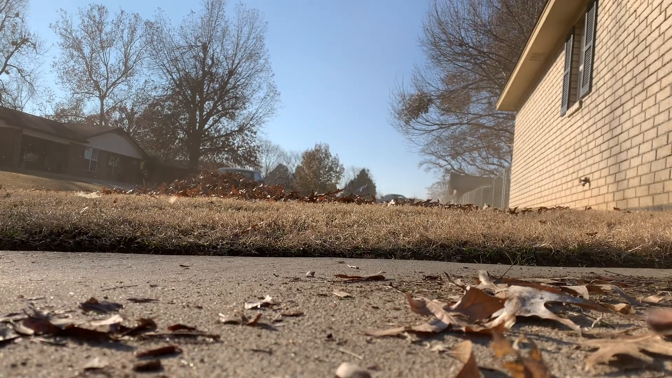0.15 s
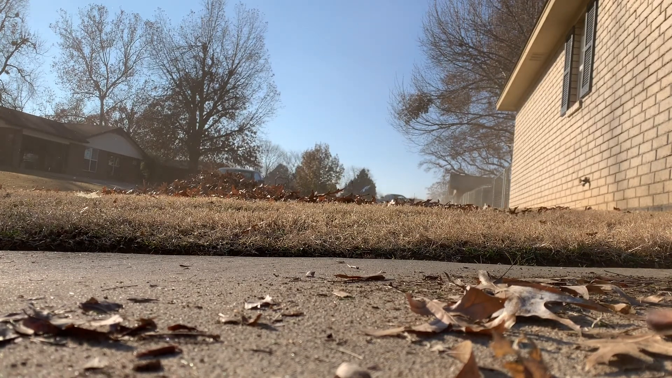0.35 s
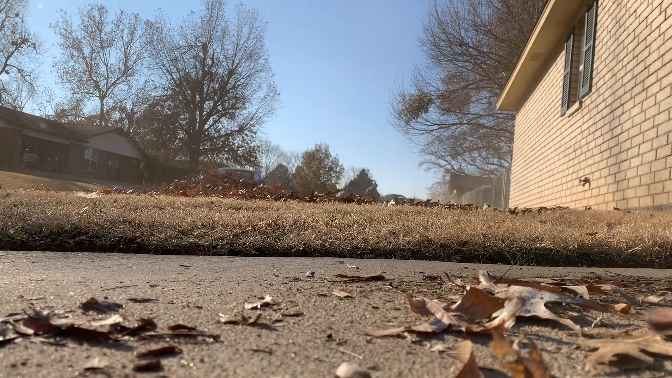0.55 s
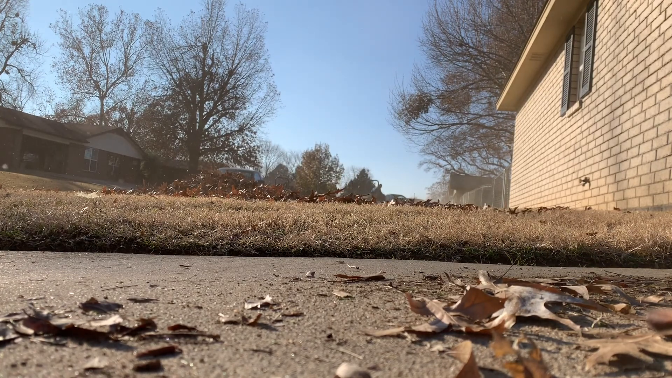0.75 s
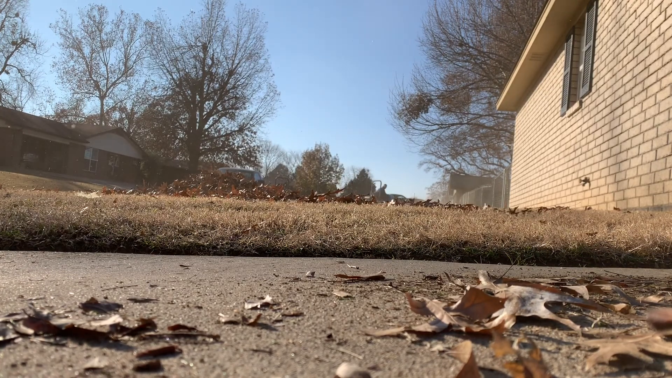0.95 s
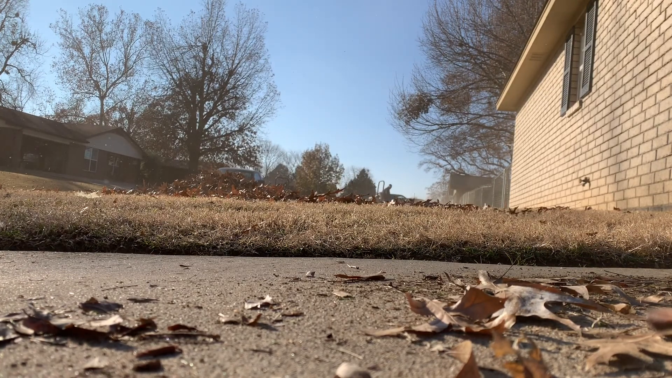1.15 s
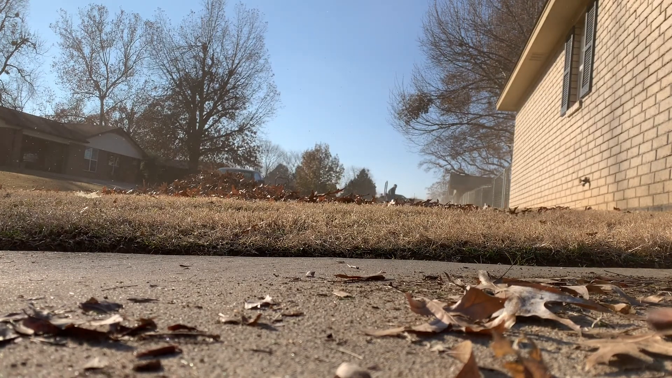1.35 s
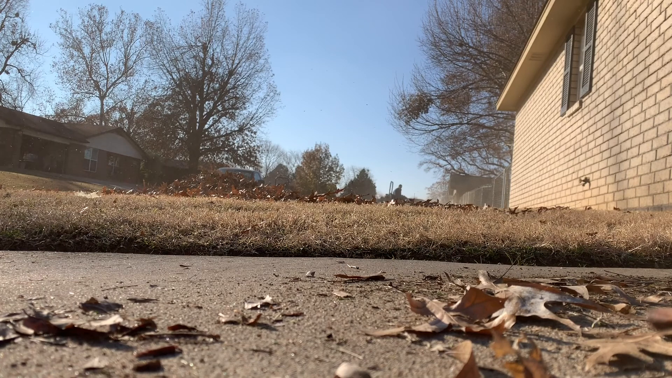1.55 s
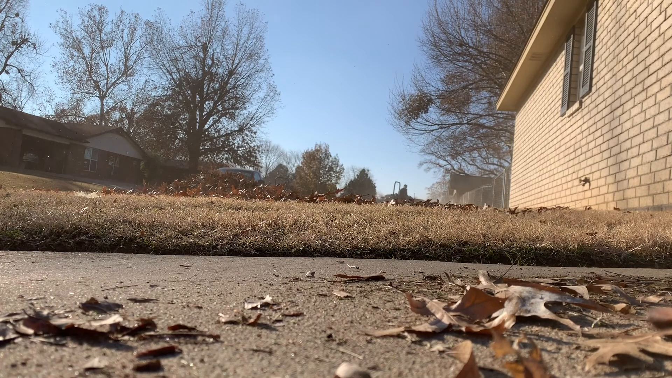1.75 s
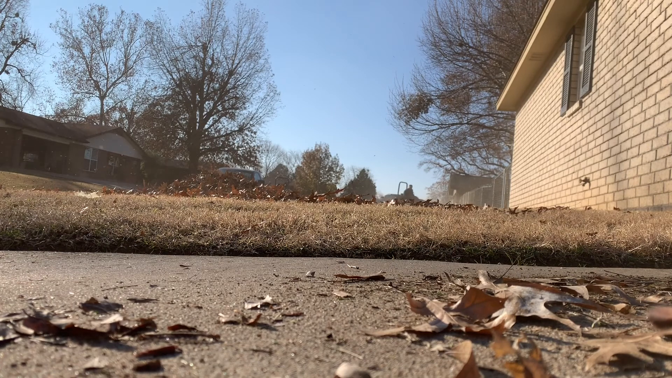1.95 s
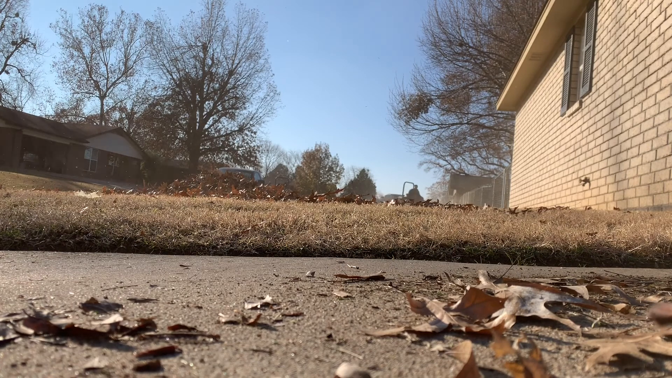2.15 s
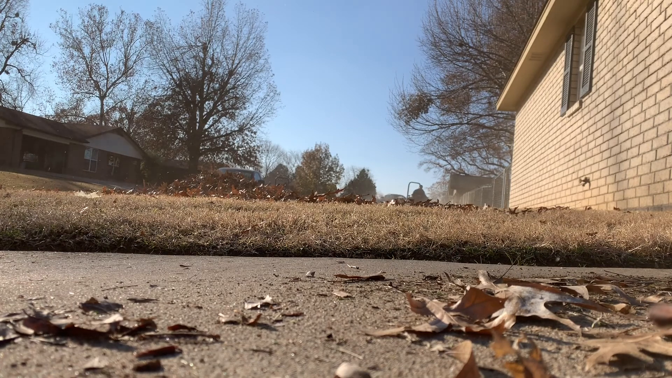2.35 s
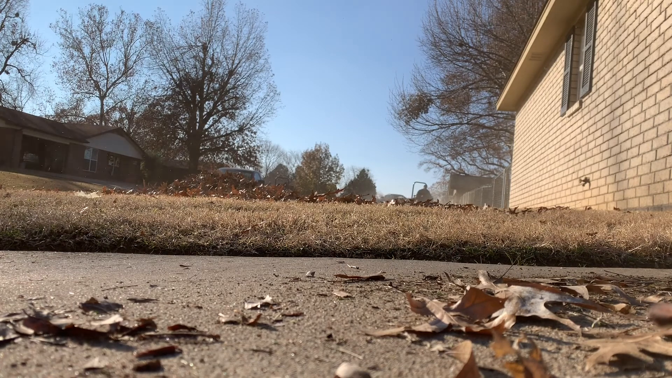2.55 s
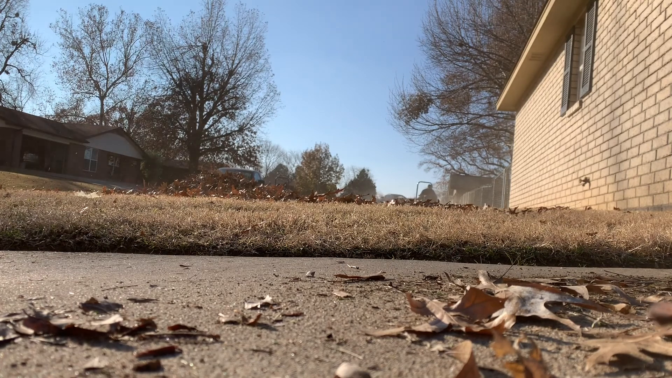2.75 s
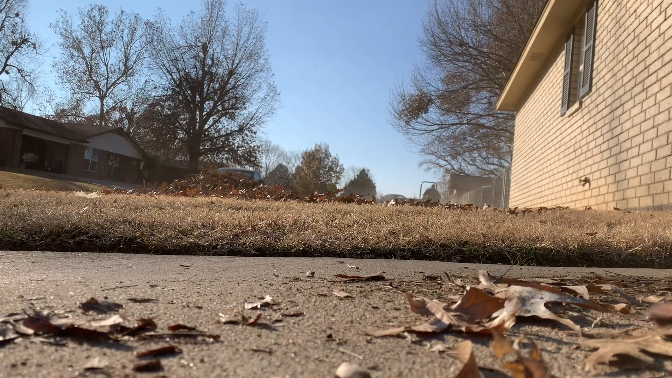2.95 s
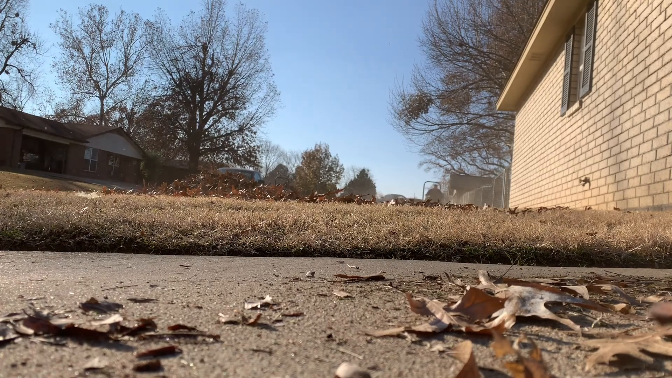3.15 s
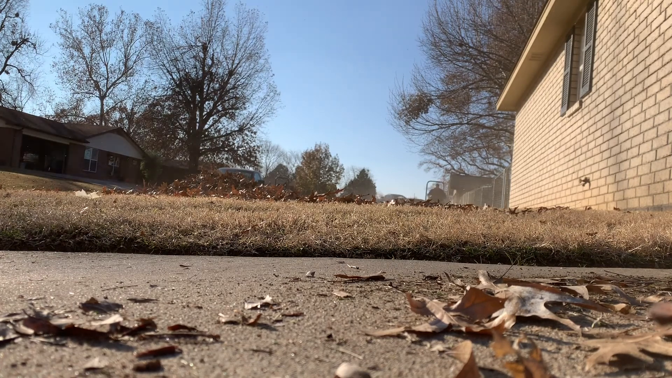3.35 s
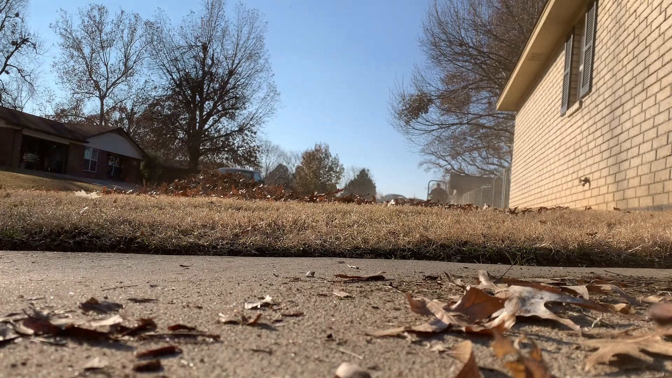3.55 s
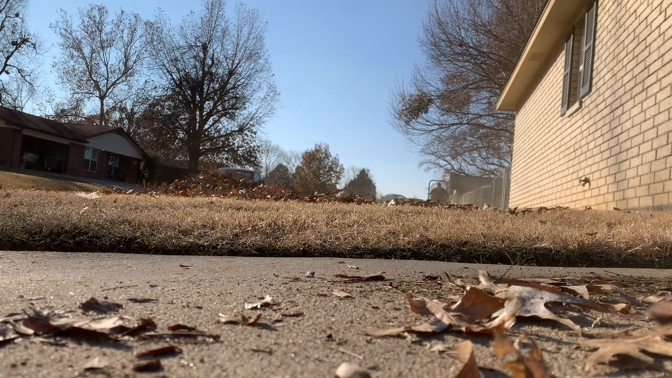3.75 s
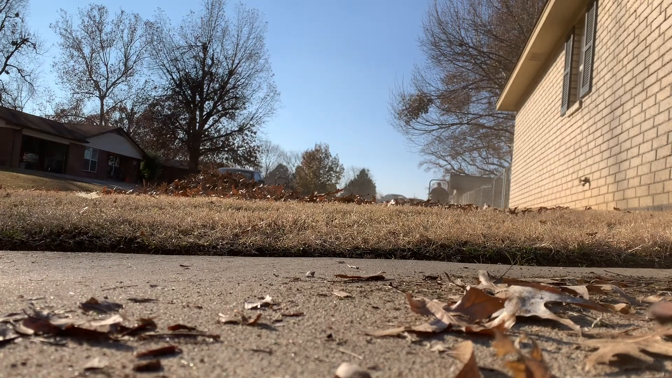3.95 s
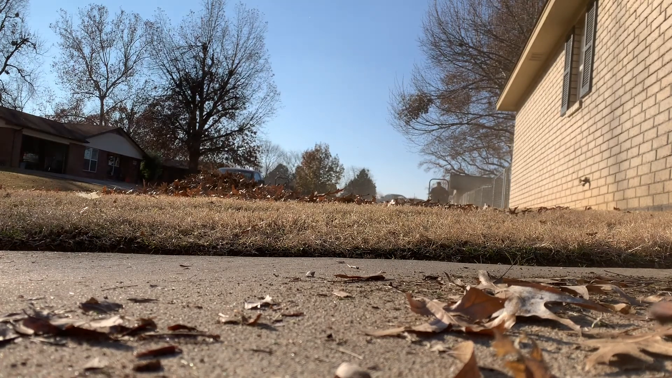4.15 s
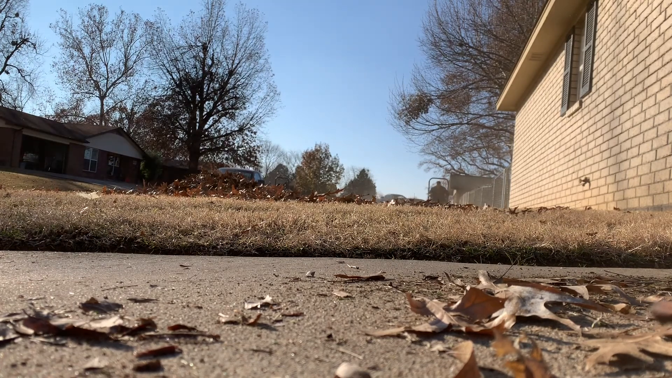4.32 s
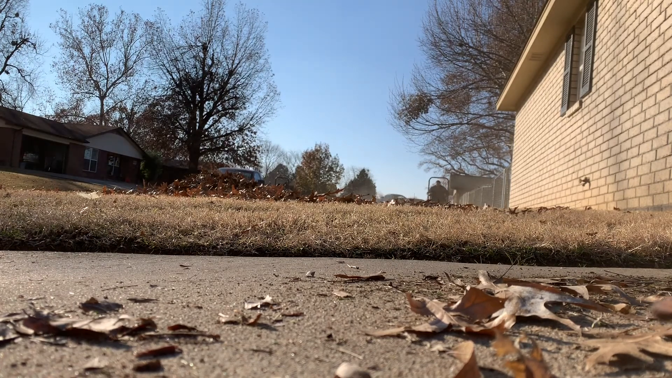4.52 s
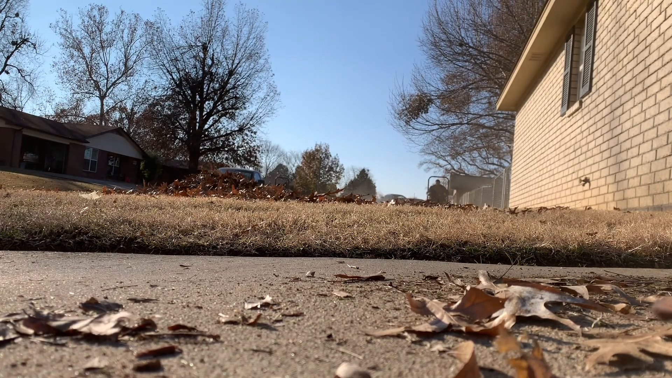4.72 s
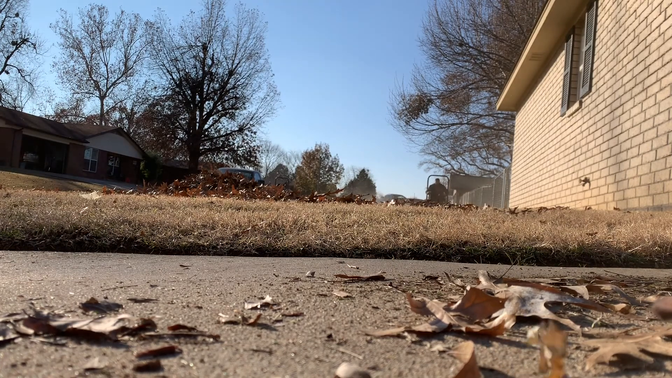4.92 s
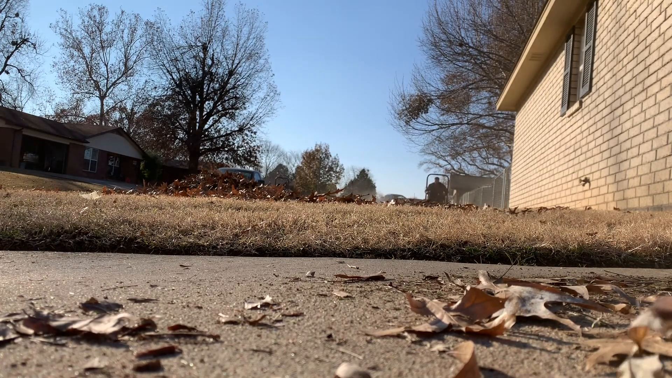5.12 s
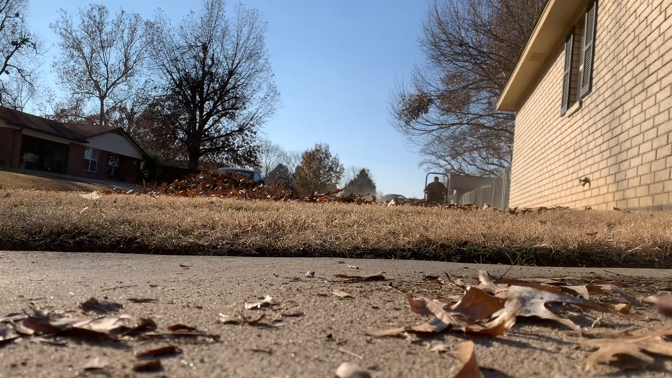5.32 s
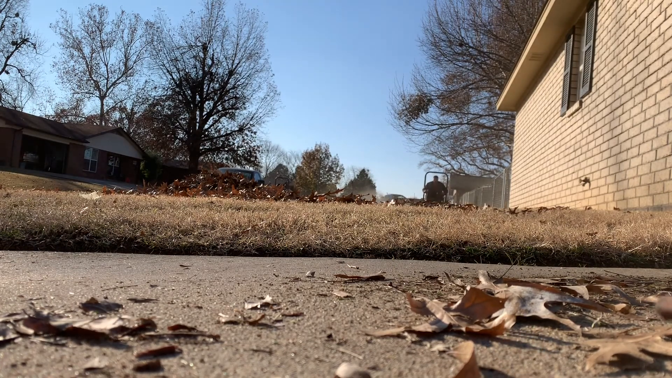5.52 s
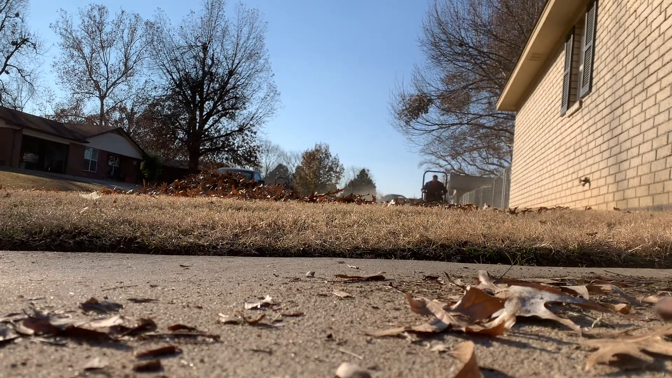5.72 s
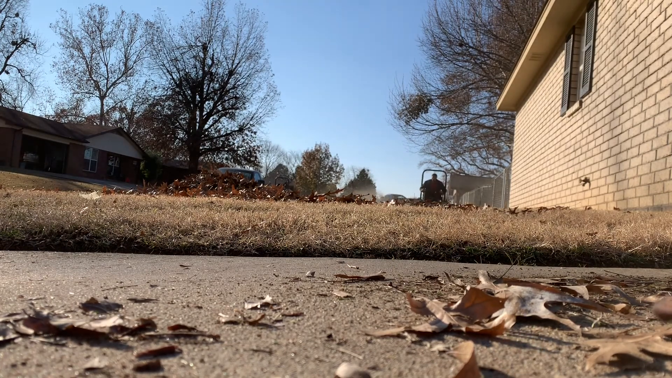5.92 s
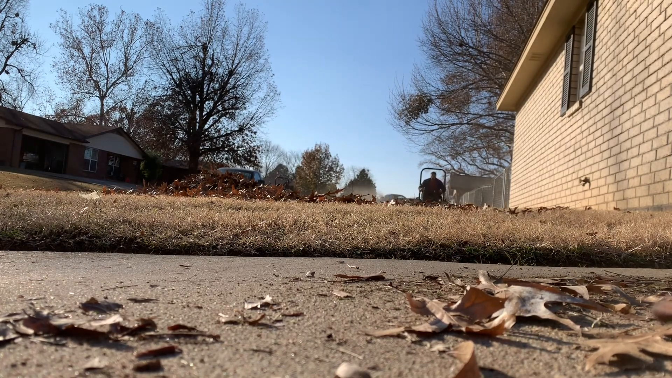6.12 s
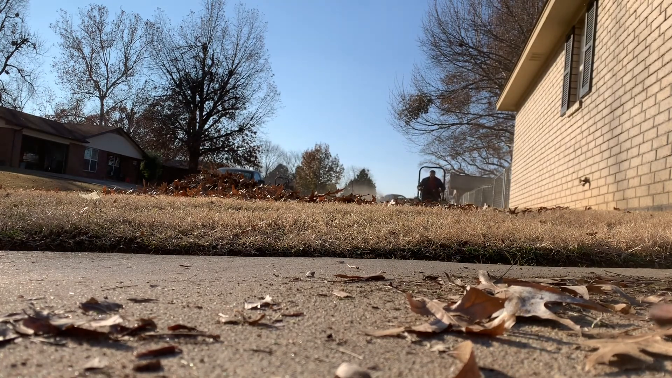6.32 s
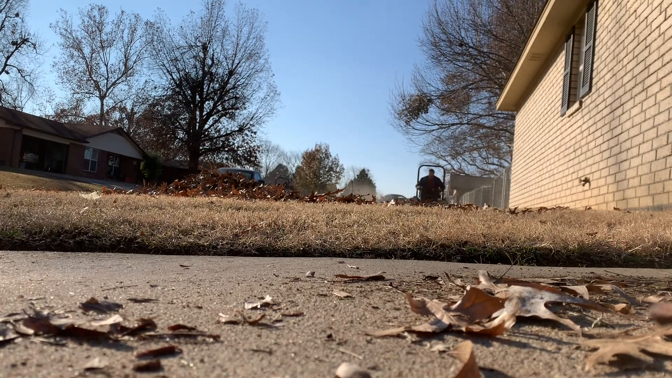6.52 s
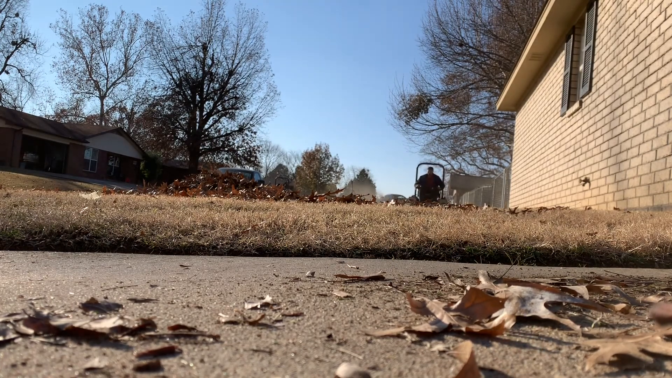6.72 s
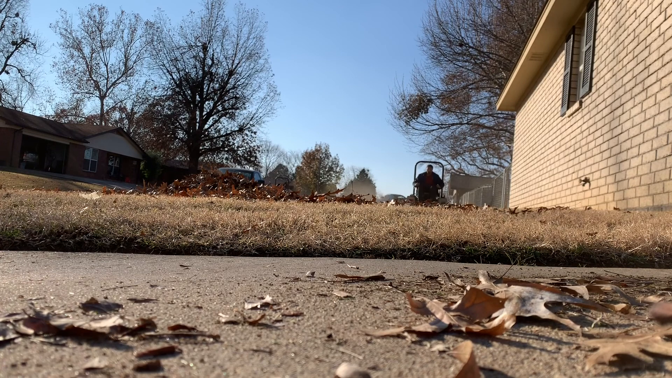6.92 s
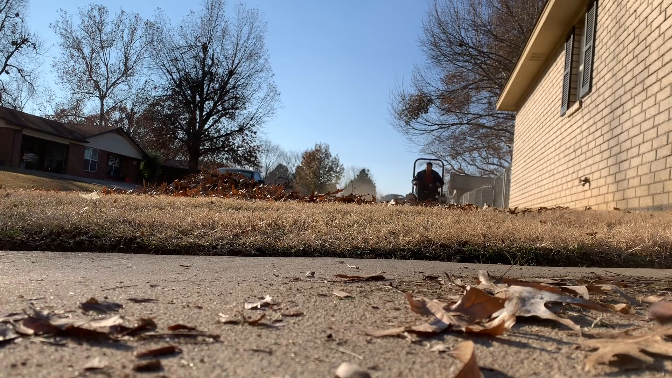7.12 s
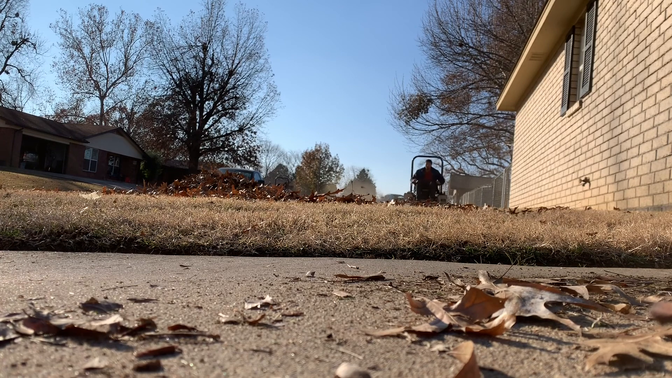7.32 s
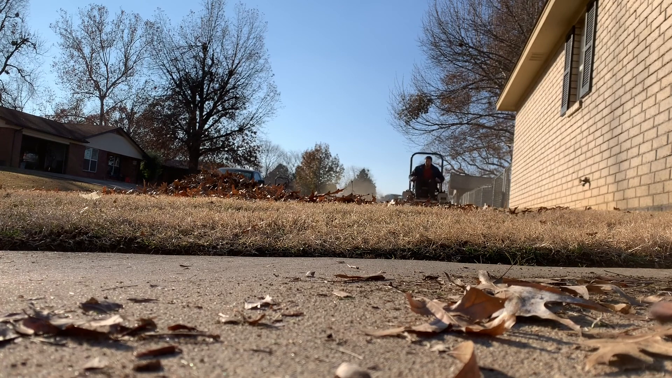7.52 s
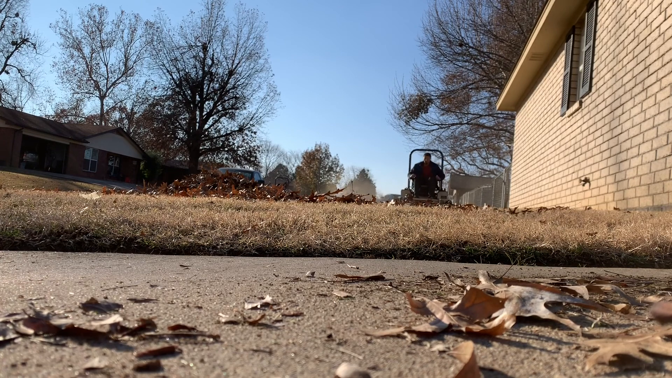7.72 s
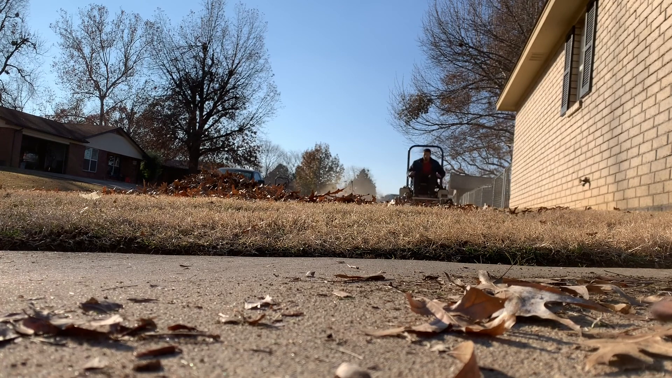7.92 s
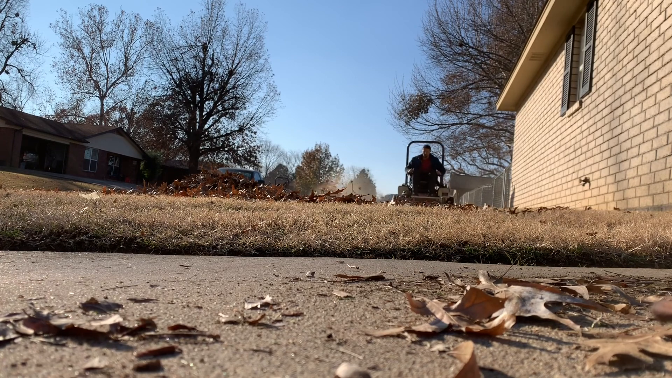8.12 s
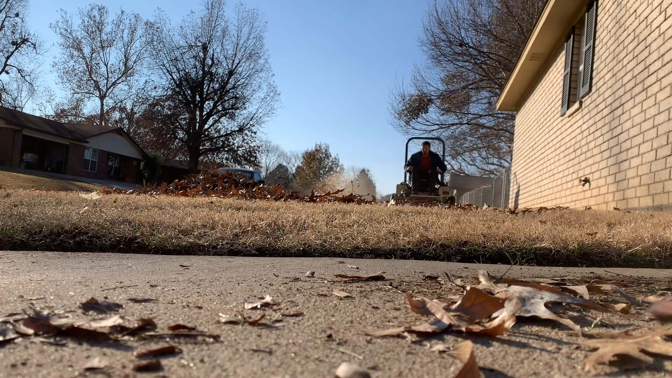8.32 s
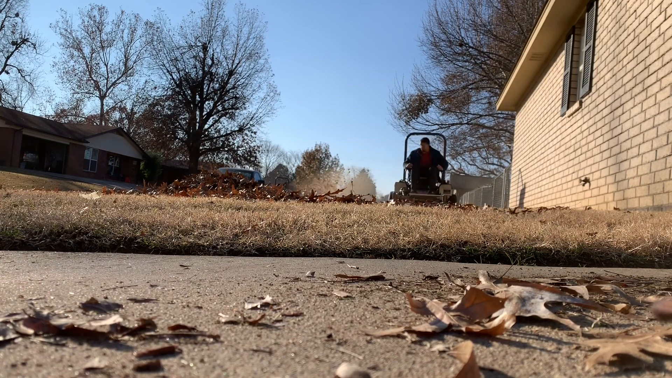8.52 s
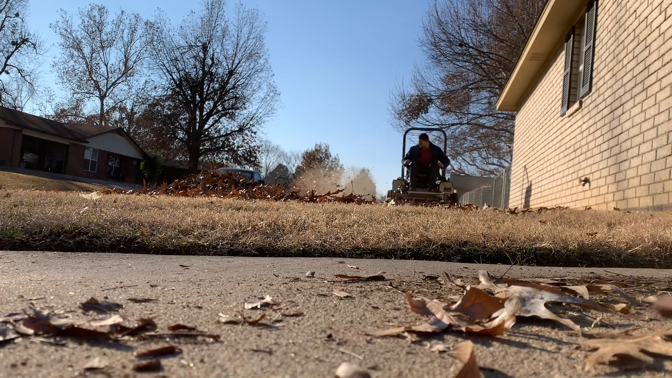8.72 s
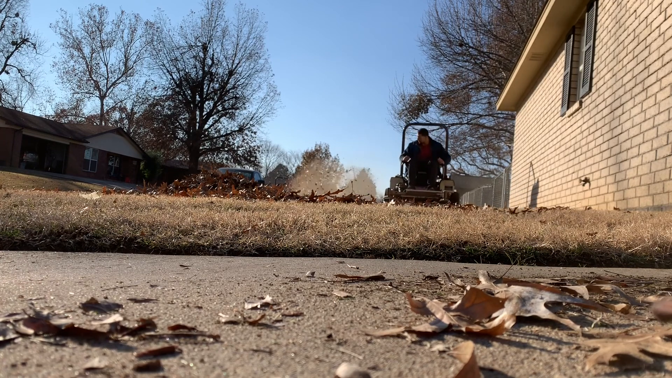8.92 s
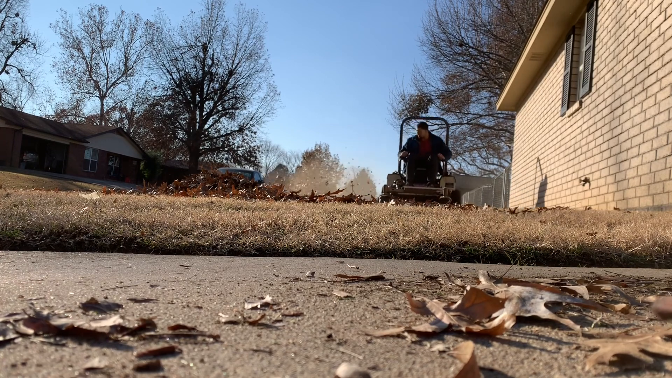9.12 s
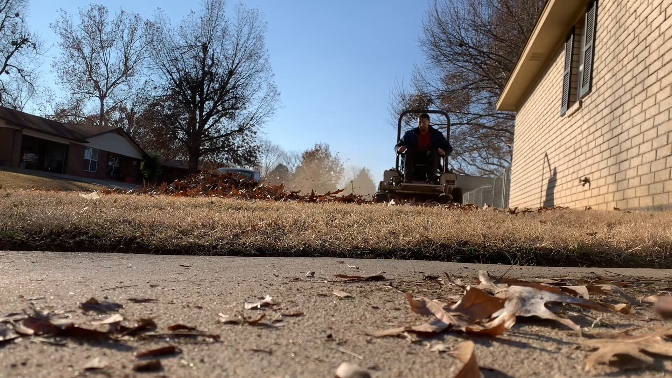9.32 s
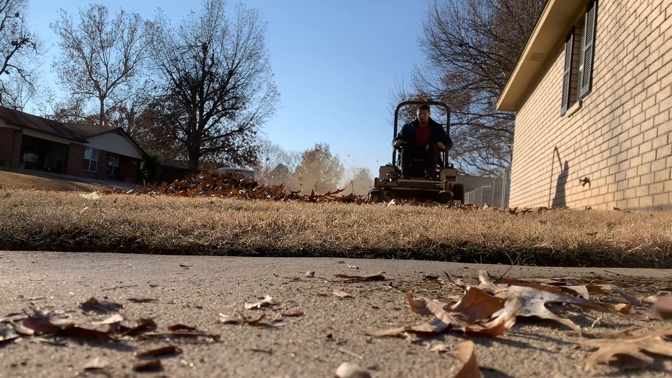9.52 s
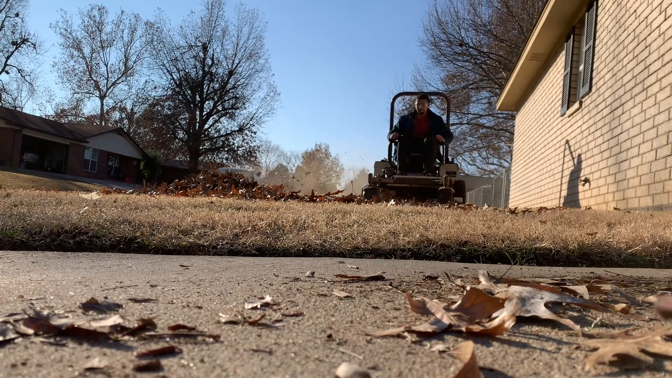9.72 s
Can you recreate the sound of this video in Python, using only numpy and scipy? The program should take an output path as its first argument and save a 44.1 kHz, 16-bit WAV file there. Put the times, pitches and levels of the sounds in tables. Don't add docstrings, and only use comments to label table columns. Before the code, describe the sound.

From 0 to 2 s a ride-on mower is far off on a lawn: a steady low hum near 130 Hz, slowly beating, over a rough uneven two-cylinder engine drone, with a faint unsteady hydraulic whine and a few tiny clicks. Around 2 to 4 s the hum swells and dips as the machine turns, while airy noise begins to rise. By 4.3 s a fuller roar of blade air and shredded leaves comes forward, with low wind buffets around 4 to 5.2 s and another near 6.9 s. From 5.5 s twigs snap, with a dense cluster near 5.9 s, and short hollow metal rattles start. From 6.4 to 9.7 s deck panels and chute flap knock irregularly, leaves crackle, and the roar grows brighter and nearer, ending at its loudest without stopping. The stereo microphone stays still at ground level on a path, with light echo from a house wall.

```python
import sys
import numpy as np
from scipy import signal
from scipy.fft import rfft, irfft, next_fast_len
from scipy.io import wavfile
from scipy.ndimage import uniform_filter1d

SR = 44100
rng = np.random.default_rng(int(sys.argv[2]) if len(sys.argv) > 2 else 0)


def amplitude_ratio(level_db):
    exponent = np.asarray(level_db, float) / 20
    return 10 ** exponent


def persist_wave(psi):
    counts = np.round(np.clip(psi, -1, 1) * 32767).astype(np.int16)
    wavfile.write(sys.argv[1], SR, np.atleast_2d(counts).T)


N = 430416
T = np.arange(N) / SR
SLOW = 64
T_SLOW = T[::SLOW]


def curves(table):
    s, *columns = np.transpose(table)
    return [np.interp(T, s, column) for column in columns]


def on_log(table, hz):
    f, value = np.transpose(table)
    return np.interp(np.log(hz + 1), np.log(f + 1), value)


def full_rate(slow):
    return np.interp(T, T_SLOW, slow)


def walk(rate_hz, rows=1, size=N, per_s=SR):
    hold = max(int(per_s / rate_hz), 1)
    held = np.repeat(rng.standard_normal((rows, size // hold + 1)), hold, axis=1)
    return 1.38 * uniform_filter1d(uniform_filter1d(held, hold), hold)[:, :size]


def bells(rows):
    return sum(db * np.exp(-((T_SLOW - s) / half_s) ** 2) for s, half_s, db in rows) + 0 * T_SLOW


def band(x, lo_hz, hi_hz):
    return signal.sosfilt(signal.butter(2, [lo_hz, hi_hz], "band", fs=SR, output="sos"), x)


def partial(turns, multiple, db, shake_db, slip_rad, lead_rad=0):
    shake, drift = (full_rate(w) for w in walk(18, rows=2, size=len(T_SLOW), per_s=SR / SLOW))
    phase = 2 * np.pi * multiple * turns + lead_rad + slip_rad * drift
    return np.sqrt(2) * amplitude_ratio(db + shake_db * shake) * np.sin(phase)


# time in seconds, rate in Hz.
TIP_PASS_HZ = [(0, 130.4), (.8, 129.5), (2.2, 130.7), (3, 130.1), (3.6, 130.6), (4.7, 131.3), (5.2, 130.6),
               (5.7, 131.7), (7, 131), (8, 130.7), (8.7, 131.7), (9.76, 130.8)]
# time in seconds, lead of each outer blade (two columns) over the middle in tip passes.
BELT_SLIP = [(0.0, 0.12, 0.86), (0.2, 0.11, 0.84), (0.41, 0.15, 0.81), (0.61, 0.38, 0.87),
             (0.81, 0.49, 0.89), (1.02, 0.43, 0.87), (1.22, 0.46, 0.89), (1.42, 0.47, 0.91),
             (1.63, 0.47, 1.03), (1.83, 0.53, 1.11), (2.03, 0.59, 1.02), (2.24, 0.56, 1.06),
             (2.44, 0.55, 1.1), (2.64, 0.38, 1.24), (2.85, 0.13, 1.38), (3.05, 0.16, 1.4),
             (3.25, 0.17, 1.44), (3.46, 0.14, 1.4), (3.66, 0.12, 1.37), (3.86, 0.11, 1.44),
             (4.07, 0.1, 1.45), (4.27, 0.71, 1.54), (4.47, 0.86, 1.48), (4.68, 0.8, 1.48),
             (4.88, 0.68, 1.5), (5.08, 0.49, 1.61), (5.29, 0.39, 1.64), (5.49, 0.37, 1.72),
             (5.69, 0.28, 1.82), (5.9, 0.22, 1.86), (6.1, 0.1, 2.05), (6.3, 0.04, 2.13),
             (6.51, -0.03, 2.39), (6.71, -0.07, 2.53), (6.91, -0.26, 2.48), (7.12, -0.24, 2.61),
             (7.32, -0.28, 2.6), (7.52, -0.3, 2.63), (7.73, -0.25, 2.69), (7.93, -0.3, 2.72),
             (8.13, -0.31, 2.83), (8.34, -0.3, 2.84), (8.54, -0.11, 3.01), (8.74, -0.08, 2.98),
             (8.95, -0.15, 3.07), (9.15, -0.22, 3.14), (9.35, -0.45, 3.25), (9.56, -0.49, 3.38),
             (9.76, -0.45, 3.33)]
# time in seconds, echo lag in tip passes, load on the blades in dB.
WALL_ECHO = [(0.0, 0.87, -2.1), (0.2, 0.73, -1.4), (0.41, 0.68, -1.9), (0.61, 0.64, -2.3),
             (0.81, 0.74, -2.0), (1.02, 0.75, -2.2), (1.22, 0.85, -0.1), (1.42, 0.86, -1.4),
             (1.63, 0.8, -3.2), (1.83, 0.89, 0.2), (2.03, 1.02, 4.7), (2.24, 1.07, 4.3), (2.44, 1.06, 5.0),
             (2.64, 0.98, 5.3), (2.85, 1.01, 7.7), (3.05, 1.0, 7.3), (3.25, 1.0, 3.8), (3.46, 1.02, 1.5),
             (3.66, 1.1, -0.7), (3.86, 1.11, -2.4), (4.07, 1.12, -1.9), (4.27, 1.31, -2.9),
             (4.47, 1.15, 0.7), (4.68, 1.22, 1.6), (4.88, 1.19, -0.0), (5.08, 1.25, -0.7),
             (5.29, 1.25, -3.1), (5.49, 1.16, -3.4), (5.69, 1.18, -3.2), (5.9, 1.15, -1.8),
             (6.1, 1.12, -1.1), (6.3, 1.17, -0.8), (6.51, 1.38, -0.2), (6.71, 1.35, 1.4), (6.91, 1.35, 0.5),
             (7.12, 1.4, -1.3), (7.32, 1.43, -0.7), (7.52, 1.51, 1.1), (7.73, 1.45, 2.0), (7.93, 1.48, 0.9),
             (8.13, 1.53, 1.3), (8.34, 1.54, -0.9), (8.54, 1.58, -1.8), (8.74, 1.56, -2.7),
             (8.95, 1.76, -2.0), (9.15, 1.72, 0.2), (9.35, 1.78, -1.8), (9.56, 1.87, -0.4),
             (9.76, 1.84, 1.0)]
# level in dB, share of the deck's turning in dB per dB.
TIP_MULTIPLES = [(-34, -0.074), (-34.5, 0.75), (-42.5, 0.14), (-46.5, 0.9), (-46, 1.4), (-46.5, 1.1),
                 (-54.5, 1), (-53.5, 3), (-52.5, 1.24), (-67, 1.9)]
TIP_SWELLS = {1: [(6.98, 0.32, 4), (9.4, 0.162, -1.5), (4.4, 0.12, 2), (3.71, 0.099, -6)],
              2: [(.3, .1, -4), (.55, .1, 3), (2.47, .1, -8), (5.3, .1, -3.5), (5.53, .1, 5.5),
              (8.12, .12, -1), (2.7, 0.082, 8), (4.3, 0.51, 1), (5.36, 0.12, -1), (7.95, 0.34, -5.5),
              (8.4, 0.098, 2.5), (9.55, .15, -2.5)], 3: [(2.3, 0.18, 0.5), (4.8, .35, 3), (6.1, 0.16, 1),
              (6.5, 0.15, -8), (4.36, 0.14, -7)], 4: [(1.4, 0.36, 4), (6.66, 0.17, 5), (7.1, 0.16, -6),
              (7.9, 0.18, 5)], 5: [(2.1, .25, 3.5), (8.85, 0.41, 8), (2.5, 0.13, 6), (1.75, .15, -7),
              (9, .17, -15)], 6: [(3.57, 0.17, 5), (8.8, 0.12, 2.5), (8.3, 0.4, 0), (4.07, .12, 5)],
              7: [(2.0, .25, 3), (7.9, 0.27, 4)], 8: [(1.2, .45, 6), (8.5, 0.26, 4), (9.4, .25, 6)],
              9: [(1.0, 0.26, 13.5), (2.3, 0.11, 4.5), (6.5, 0.28, 9)]}


def blades(turned_db):
    left_blade, right_blade, wall = .5, .46, -.46
    turns = np.cumsum(curves(TIP_PASS_HZ)[0]) / SR
    left, right, lag, load_db = (c[::SLOW] for c in curves(BELT_SLIP) + curves(WALL_ECHO))
    out = 0
    for k, (db, share) in enumerate(TIP_MULTIPLES, 1):
        spin = 2j * np.pi * k
        trio = 1 + left_blade * np.exp(spin * left) + right_blade * np.exp(spin * right)
        beat = trio * (1 + wall * np.exp(spin * lag))
        lead = full_rate(np.unwrap(np.angle(beat)))
        lead = (lead + k * k) * (k > 2)
        tone = partial(turns, k, db + share * turned_db, 0.4 + 0.07 * k, .018 * k, lead)
        swell_db = bells(TIP_SWELLS.get(k, []))
        out = out + tone * full_rate(abs(beat) * amplitude_ratio(load_db + swell_db))
    return out, turns


# time in seconds, effort as heard in dB, wall echo lag in cycles.
ENGINE_EFFORT = [(0.0, 0, 0.77), (0.45, -0.5, 0.632), (1.27, -2.5, 0.64), (2.02, -3.5, 0.565),
                 (2.65, -2, 0.704), (3.25, -1.5, 0.734), (3.92, -1, 0.753), (4.54, -0.5, 0.69),
                 (5.16, 1, 0.7), (5.82, 0.3, 0.79), (6.55, 0, 0.86), (7.19, 4, 0.803), (7.87, 1.5, 0.89),
                 (8.46, 2.5, 0.71), (9.04, 4, 0.75), (9.76, 5.5, 0.9)]
# time in seconds, rate in Hz.
CYCLE_HZ = [(0, 29.45), (.8, 29.1), (2, 29.35), (4.5, 29.3), (5.6, 29.55), (7, 29.35), (8.8, 29.55),
            (9.76, 29.3)]
# multiple of the cycle rate, level in dB, share of the effort swing in dB per dB.
FIRING_MULTIPLES = [(1, -63, .8), (2, -42, 1.28), (3, -44, 1.75), (4, -52.5, 0.97), (5, -46, 0.47),
                    (6, -45.5, 0.79), (7, -56.5, 0.56), (8, -52.5, 0.35), (10, -50.5, 0.29), (11, -74, .8),
                    (12, -76, .8), (14, -58, 0.71), (15, -64.5, .8)]
FIRING_DIPS = {2: [(.3, .4, -6)], 6: [(2.5, .7, -3.5), (9.0, .25, -5.5)], 7: [(9.2, 0.43, -10)],
               10: [(.2, .3, -6)]}


def engine():
    echo_strength, wander_db = 0.19, .12
    effort_db, lag = curves(ENGINE_EFFORT)
    turns = np.cumsum(curves(CYCLE_HZ)[0]) / SR
    out = 0
    for k, db, share in FIRING_MULTIPLES:
        echo = abs(1 + echo_strength * np.exp(2j * np.pi * k * lag[::SLOW]))
        dip = amplitude_ratio(bells(FIRING_DIPS.get(k, [])))
        level_db = db + share * effort_db + wander_db * k * walk(1.5)[0]
        out = out + full_rate(echo * dip) * partial(turns, k, level_db, shake_db=0.25, slip_rad=0.2)
    return out


# time in seconds, piston rate in Hz, level in dB.
DRIVE_PUMP = [(0, 406, -79), (.8, 407, -85), (1.4, 409.5, -84), (2, 414, -99), (9.76, 400, -92)]


def pump():
    hz, db = curves(DRIVE_PUMP)
    turns = np.cumsum(hz) / SR
    return sum(partial(turns, k, db, shake_db=4.0, slip_rad=2.5) for k in range(7, 12))


# frequency in Hz, curve number from 0.
CURVE_AT_HZ = [(300, 0), (700, 1), (1150, 2), (1650, 3), (2600, 4), (3800, 5), (4900, 5), (6000, 6),
               (11500, 6), (13000, 7)]
# frequency in Hz, density in dB per Hz.
ROAR_SPECTRUM = [(40, -73), (110, -61.5), (200, -64.5), (330, -66.5), (480, -68), (700, -70.5), (1000, -72),
                 (1200, -73.5), (1420, -81), (2000, -85.5), (2800, -89.5), (3400, -92.5), (4700, -96.5),
                 (5700, -102), (7000, -100), (8300, -103), (12000, -105), (15500, -109)]
# time in seconds, half length in seconds,
# frequency in Hz, half width in Hz, level in dB.
ROAR_STRIPS = [(3.6, 2.2, 5750, 300, 4), (7.2, 3.1, 6250, 500, -3.5), (2.0, 2.4, 14200, 800, -8),
               (3.2, 2.1, 3050, 250, -4.5), (8.7, 1.4, 3000, 250, 2), (7.4, .8, 3500, 210, 5.5),
               (5.6, 1.3, 17000, 460, 14), (6.3, .9, 5350, 160, -6), (.8, 1.6, 7900, 350, 0),
               (7.2, .4, 310, 39, -5.5), (3.6, 1.5, 2200, 250, 1.5), (5.5, 1.3, 16000, 900, -5),
               (.3, .5, 4500, 250, 4)]


def roar(turns, levels_db):
    hz, s, z = signal.stft(rng.standard_normal((2, N)), SR, nperseg=512)
    grid = dict(size=len(s), per_s=SR / 256)
    swing = np.array([np.interp(s, T, db - db.mean()) for db in levels_db])
    place = on_log(CURVE_AT_HZ, hz)
    weight = np.maximum(1 - abs(place[:, None] - np.arange(len(levels_db))), 0)
    strips = (np.sqrt(hz / hz[-1]) * 47.9).astype(int)
    flicker = walk(12, rows=24, **grid)[strips // 2]
    drift = walk(.9, rows=48, **grid)[strips]
    drift = uniform_filter1d(drift, size=5, axis=0) * (hz > 900)[:, None] * 1.2
    bursts = walk(24, **grid)
    bursts = (bursts - uniform_filter1d(bursts, size=25)) * np.clip(hz / 5000, 0, 1)[:, None]
    db = on_log(ROAR_SPECTRUM, hz)[:, None] + weight @ swing + 0.99 * flicker + drift + 1.2 * bursts
    for at_s, half_s, f, wide_hz, strip_db in ROAR_STRIPS:
        db = db + strip_db * np.exp(-((hz[:, None] - f) / wide_hz) ** 2 - ((s - at_s) / half_s) ** 2)
    air = signal.istft(z * amplitude_ratio(db), SR, nperseg=512)[1][:, :N] * np.sqrt(SR / 2)
    return air * (1 + .04 * np.cos(2 * np.pi * turns))


# time in seconds, half length in seconds, level in dB.
WIND_GUSTS = [(0, .15, -66), (0.552, 0.26, -67), (1.204, 0.31, -71), (3.65, .25, -60), (4.095, 0.2, -56),
              (4.55, 0.35, -60), (5.03, 0.073, -48), (5.222, .1, -47), (5.555, 0.39, -58),
              (6.142, 0.092, -60), (6.41, 0.11, -59), (6.87, 0.18, -52), (9.02, .1, -57), (9.5, .2, -61),
              (9.76, 0.047, -52)]


def gusts():
    calm_db = -72
    noise = rng.standard_normal((3, N))
    rumble = band(band(noise[0] + .04 * noise[1:], 26, 90), 14, 150)
    wind = amplitude_ratio(calm_db)
    for s, half_s, db in WIND_GUSTS:
        wind = wind + amplitude_ratio(db) * np.exp(-((T_SLOW - s) / half_s) ** 2)
    return rumble / rumble.std() * full_rate(wind) * amplitude_ratio(3.5 + 1.0 * walk(20)[0])


# time in seconds, peak level in dB, body level in dB.
TWIG_CRACKS = [(0.6664, -57, -5), (0.7277, -56, -5), (0.8094, -62, 2), (2.3294, -64, 5), (2.4594, -64, 5),
               (2.7744, -64, 5), (5.0749, -49, -2), (5.5214, -48, 19), (4.0271, -55, -3), (4.6642, -53, -3),
               (4.8932, -52, -3), (5.3282, -52, -3), (5.5676, -50, -5), (5.8086, -48, 3), (5.8326, -45, 2),
               (5.8854, -43, 5), (5.8994, -44, 5), (5.912, -45, 5), (5.94, -48, 8), (6.192, -47, 0),
               (6.4481, -46, -3), (7.9861, -48, -4), (8.5893, -43, -6), (8.8971, -43, -6),
               (9.2897, -44, -6), (6.0881, -46, -4), (6.2711, -42, -3), (6.4684, -44, -4),
               (6.6308, -47, -2), (7.1666, -46, -4), (7.4514, -45, -5), (7.635, -39, -14),
               (8.1314, -45, -7), (8.1594, -43, -7), (8.4357, -43, -7), (8.746, -42, -6), (8.8403, -43, -6),
               (9.0568, -43, -6), (9.4424, -41, -6), (9.5154, -43, -4)]


def twigs(hiss_db):
    bright, body, t = np.zeros(N + SR), np.zeros(N + SR), T[:SR // 25]
    for s, db, body_db in TWIG_CRACKS:
        crack = rng.standard_normal(len(t)) * np.exp(-t / .005) * amplitude_ratio(db - 2)
        start = int(s * SR)
        bright[start:][:len(t)] += crack
        body[start:][:len(t)] += crack * amplitude_ratio(body_db - 17)
    hits = rng.random(N) < 400 / SR
    sizes = amplitude_ratio(2.5 * np.minimum(rng.exponential(size=N), 3))
    crackle = hits * sizes * rng.choice([-1, 1], N) * amplitude_ratio(hiss_db - 7.0)
    return band(bright[:N] + crackle, 5000, 13500) + band(body[:N], 1800, 5000)


# time in seconds, peak level in dB, ring in Hz.
PANEL_RINGS = [(5.524, -25.5, 523.6), (5.772, -33, 704), (5.93, -32, 900), (6.141, -32.5, 875),
               (6.367, -39, 780), (6.458, -26.5, 833), (6.655, -22, 831), (6.685, -24, 827),
               (6.794, -34, 777), (6.984, -31, 980), (7.531, -27, 823), (7.727, -39, 799), (7.82, -28, 812),
               (7.962, -29, 820), (8.32, -25, 408.4), (8.964, -37, 783), (9.24, -26, 620.4),
               (7.058, -30, 890), (7.244, -23, 868), (7.334, -35, 657), (7.401, -33, 670),
               (7.901, -23.5, 842), (8.096, -27, 810), (8.207, -33, 812), (8.367, -29, 740),
               (8.432, -23, 795), (8.499, -23, 807), (8.568, -30, 809.3), (9.021, -25, 800),
               (9.078, -19, 794), (9.14, -35, 840), (9.413, -28, 753), (9.507, -28, 640), (9.591, -25, 593),
               (9.699, -32, 763)]
# time in seconds, peak level in dB, ring in Hz.
FLAP_RINGS = [(5.79, -35, 1183), (5.92, -33, 1194), (6.401, -32, 1230), (6.72, -25.5, 1063),
              (7.058, -24, 1206), (7.15, -26, 1063), (7.29, -26, 1203), (8.68, -28, 1024),
              (6.647, -25, 1200), (6.765, -23, 1168), (6.9324, -29, 1180), (7.044, -24, 1074),
              (7.116, -26.5, 1050), (7.246, -25.5, 1115), (7.3573, -36, 1080), (7.7275, -38, 1120),
              (7.771, -34, 1036), (7.96, -38, 1160), (7.978, -22.5, 1150), (8.037, -35, 1173),
              (8.058, -35, 1260), (8.072, -20, 1220), (8.354, -34, 1170), (8.399, -43, 1050),
              (8.4947, -25, 1203), (8.5968, -33, 1170), (9.3862, -25.5, 1064), (9.4489, -30, 1193),
              (9.562, -27, 1067), (9.6, -26, 1050), (9.644, -36, 1080), (9.7, -28, 1167)]


def rattles():
    out, t = np.zeros(N + SR), T[:SR // 8]
    swell = (1 - np.exp(-t / .0045)) * np.exp(-t / .011)
    for s, db, hz in PANEL_RINGS + FLAP_RINGS:
        out[int((s - .003) * SR):][:len(t)] += amplitude_ratio(db + 2.5) * swell * np.sin(2 * np.pi * hz * t)
    return out[:N]


# frequency in Hz, lag of the left port in radians.
PORT_LAG = [(20, 0), (1000, .9), (1950, 3.1), (2150, 6.7), (2600, 7.4), (3500, 9.4), (3950, 12.0),
            (4250, 12.8), (4600, 13.1), (5400, 15.5), (5850, 18.3), (6300, 19.0), (6900, 21.9),
            (8000, 23.9), (9300, 25.1), (11300, 28.2)]
# frequency in Hz, left minus right in dB.
PORT_TILT = [(60, -0.5), (200, 1.9), (700, -0.5), (1200, 1.5), (1800, 1), (2100, -4), (2700, 1), (3600, 2),
             (5800, 0), (7300, 2), (8300, -1), (10500, -2), (11300, 0)]
# frequency in Hz, likeness of the ports' scattered sound from 0 to 1.
PORT_LIKENESS = [(100, 0.63), (700, 0.92), (1300, 0.9), (1800, 0.66), (2500, 1), (3100, 0.96), (3600, 0.81),
                 (4200, 0.75), (5400, 0.62), (6150, 0.071), (6800, 0.66), (8500, .7), (9500, 0.45),
                 (10900, .99), (12000, 0.95)]
# frequency in Hz, level in dB.
DECK_BASS = [(15, -30), (45, -14), (110, -6), (200, -3), (300, 0)]
# time in seconds, level in dB.
SCATTERED = [(0, 0), (1.5, 0.5), (2.4, 3.5), (3.2, -1), (4.4, 0), (5.2, -2), (5.8, -0.5), (6.4, -1.5),
             (7.0, -2), (7.8, -4), (8.2, 0), (8.6, 2.5), (9.76, 3.5)]


def ports(direct, air):
    size = next_fast_len(N)
    hz = np.arange(size // 2 + 1) * SR / size
    f, radians = np.transpose(PORT_LAG)
    lag = np.interp(hz, f, radians) + 1.33 * np.maximum(hz - f[-1], 0) / 1000
    alike = np.clip(on_log(PORT_LIKENESS, hz), 0, 1)
    air = np.array([air[0], air[1] * amplitude_ratio(curves(SCATTERED)[0])])
    shared, apart = rfft(air, size) * amplitude_ratio(on_log(DECK_BASS, hz))
    mid = rfft(direct, size) + np.sqrt((1 + alike) / 2) * shared
    side = np.sqrt((1 - alike) / 2) * apart
    left = amplitude_ratio(on_log(PORT_TILT, hz) / 2) * np.exp(-.5j * lag)
    return irfft(np.array([(mid + side) * left, (mid - side) / left]), size)[:, :N]


# time in seconds, nearness in dB, deck turned this way in dB,
# blast from the chute in dB, shaking of the deck in dB.
MOWER_COURSE = [(0.0, -17.5, -16, -15.5, -17), (0.72, -20, -19.5, -15, -17.5),
                (1.22, -22.5, -17.5, -14.5, -16), (1.98, -21, -10.5, -13, -13.5),
                (2.39, -21, -12.5, -11.5, -14.5), (2.88, -21, -8.5, -12, -14.5),
                (3.42, -17.5, -8.5, -9, -13.5), (4.31, -9.5, -4.5, -2, -10), (5.07, -9, -7, -4, -11),
                (5.38, -9, -4.5, -7, -8.5), (5.72, -7.5, -3, -3.5, -10.5), (5.86, -2, -2.5, 2, -7.5),
                (6.02, -5.5, -2.5, -2, -5), (6.47, -3, -3, -1, -2), (6.68, -4, -3, 1, 0.5),
                (7.29, -0.5, 0.5, 0, 0), (7.9, 0, -0.5, -5, 0), (8.22, 1.9, -0.6, -3, -1.3),
                (9.44, 2.5, 0, -0.5, 0.5), (9.76, 4, 0.6, 2, 2.5)]
# share of nearness, of turning, of blast, of shaking, in dB per dB.
BAND_FOLLOWS = [
    (0, 0.5, 0.072, -0.063),
    (0, 0.92, -0.11, -0.069),
    (0, -0.15, -0.046, 1),
    (0.29, 0.56, 0.027, 0.048),
    (0.041, -0.058, 0.89, 0.0053),
    (0.66, -0.44, 0.42, -0.089),
    (0.9, -0.11, 0.064, 0.056),
    (1.34, 0.52, -0.41, -0.74),
]
# time in seconds, level in dB.
SIZZLE_SWAY = [(0, -1.5), (5.1, -0.5), (5.6, -8), (6.5, -4), (7.2, -2), (7.9, -3.5), (8.5, -2.5),
               (9.1, -3.5), (9.76, 1.5)]
# time in seconds, drone in dB, hiss in dB.
DRONE_HISS_SWAY = [(0, -3.5, -0.5), (.5, -4.5, 0), (1.1, -6, 1), (1.7, -5.5, 0.5), (2.2, -3, 0.5),
                   (3, -2.5, 0.5), (4.4, -0.5, 0), (5.5, -1.5, 1.5), (6.5, 0, 1), (7.3, 2.5, -0.5),
                   (7.9, -1, 0.5), (8.8, -2.5, -1), (9.76, 0, -0.5)]


def scene():
    drone, hiss, sizzle = 1, 6, 7
    course = np.array(curves(MOWER_COURSE))
    near_db, turned_db = course[:2]
    tips, turns = blades(turned_db)
    levels_db = np.array(BAND_FOLLOWS) @ course
    levels_db[sizzle] += curves(SIZZLE_SWAY)[0]
    levels_db[[drone, hiss]] += curves(DRONE_HISS_SWAY)
    direct = tips + engine() + pump() + rattles() + twigs(near_db - 57.5)
    return ports(direct, roar(turns, levels_db)) + gusts()


def roll_off(x):
    return signal.sosfilt(signal.butter(12, 15660, fs=SR, output="sos"), x)


def record(dry):
    ceiling = .2
    mix = ceiling * np.tanh(dry / ceiling)
    return roll_off(mix)


dry = scene()
out = record(dry)
persist_wave(out)
```